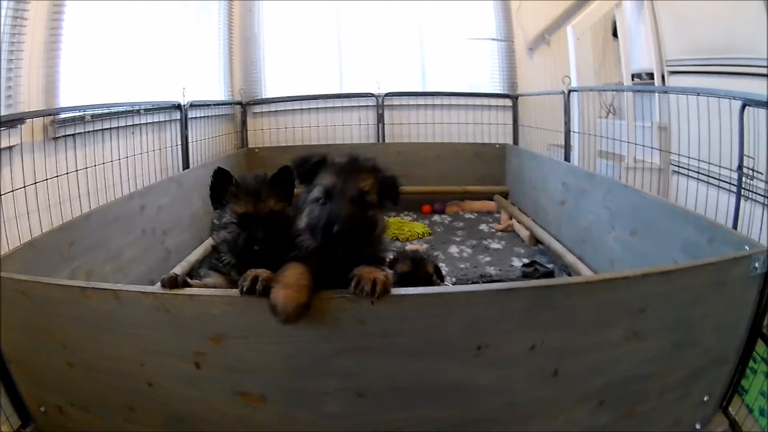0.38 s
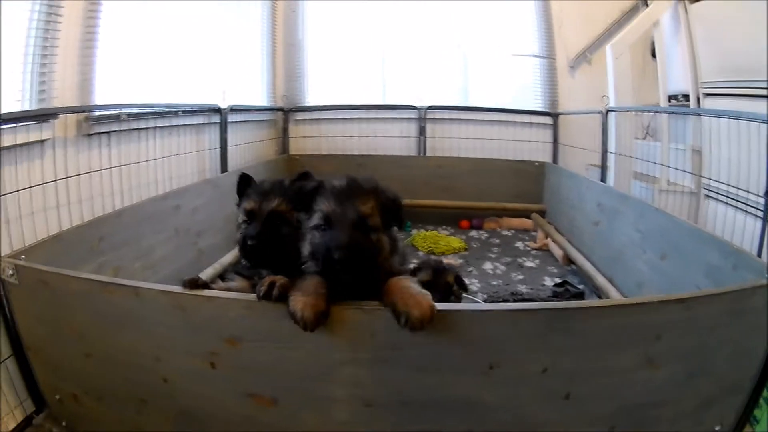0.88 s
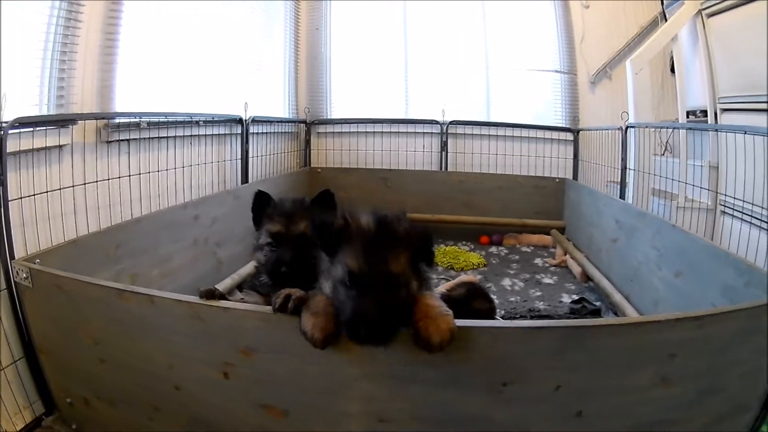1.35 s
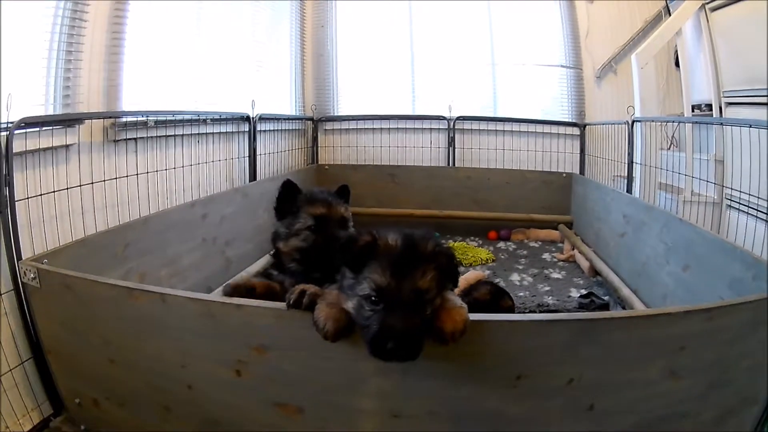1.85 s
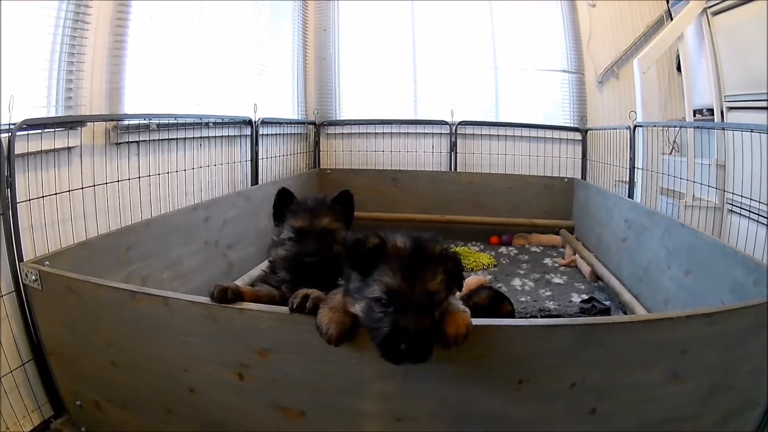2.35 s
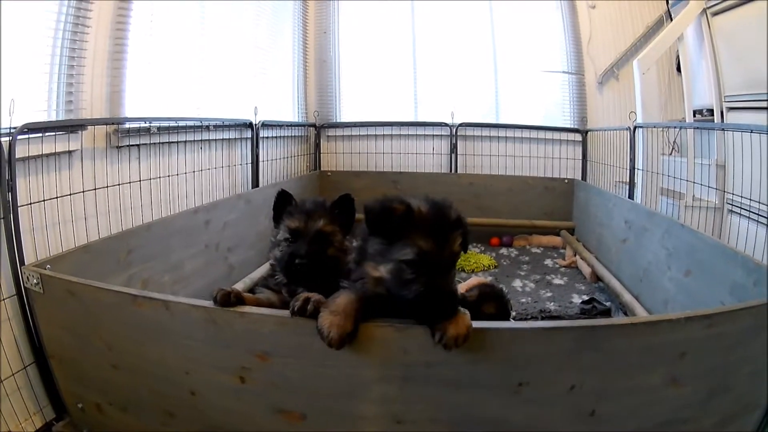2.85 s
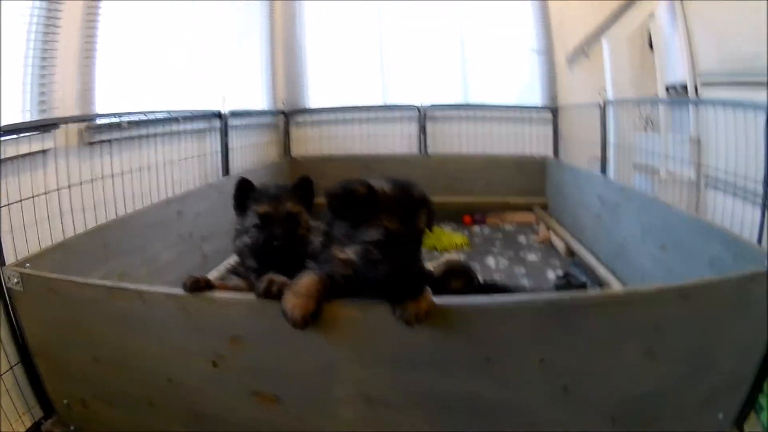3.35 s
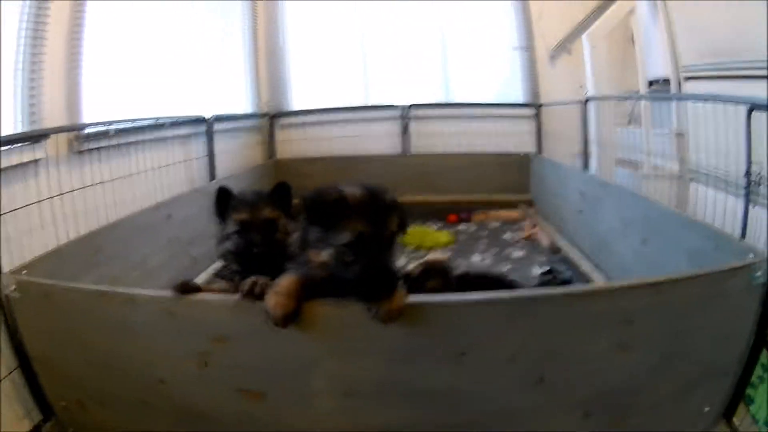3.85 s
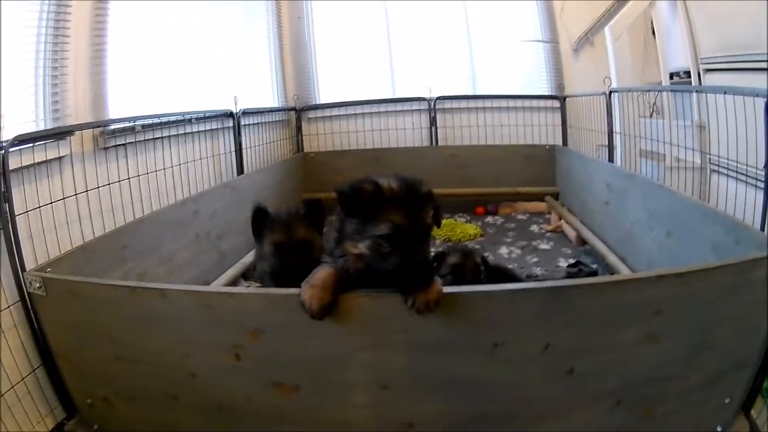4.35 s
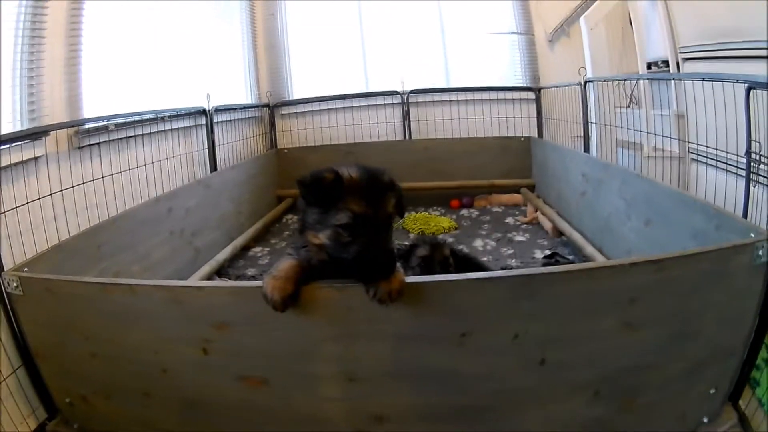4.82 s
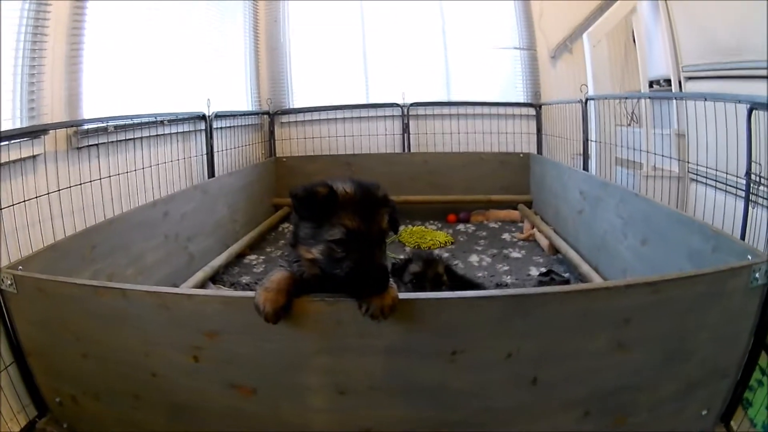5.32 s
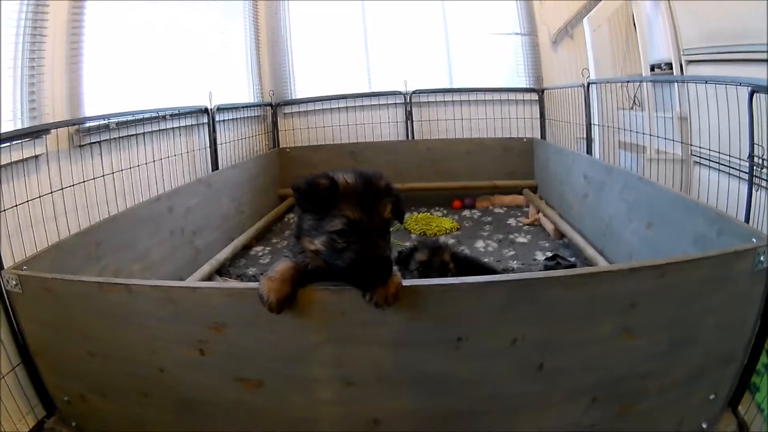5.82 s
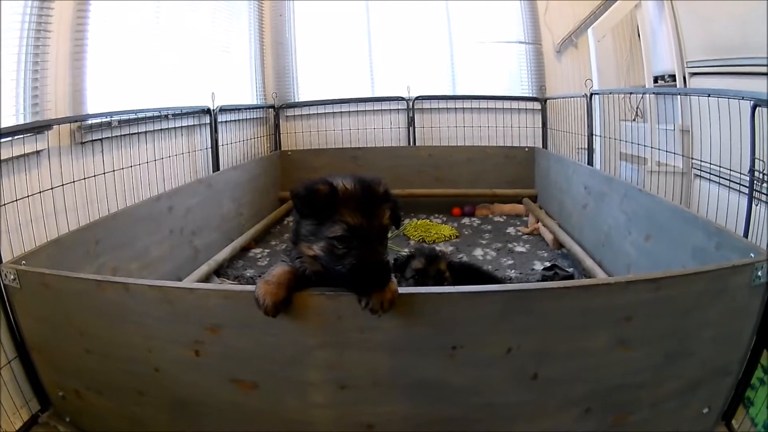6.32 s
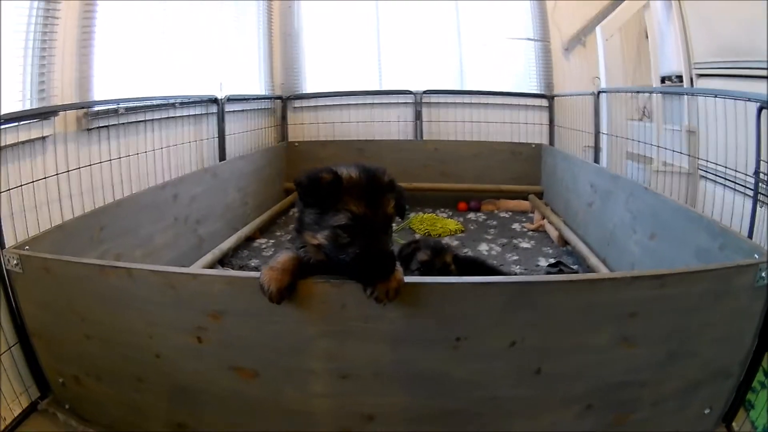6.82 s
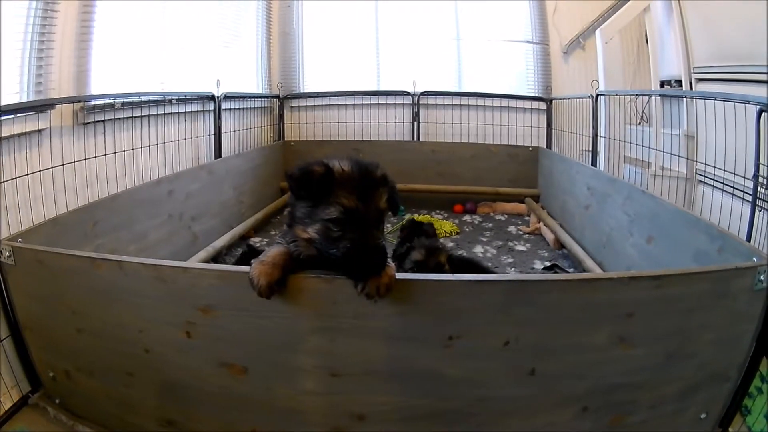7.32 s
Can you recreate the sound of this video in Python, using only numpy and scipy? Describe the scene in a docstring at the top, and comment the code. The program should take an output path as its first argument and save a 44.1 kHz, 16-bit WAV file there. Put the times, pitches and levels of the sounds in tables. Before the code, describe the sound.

A hoarse, mid-pitched puppy yap sounds at once, about a tenth of a second long, and the bare room rings after it. A soft bump and a small whine follow, then another yap at 0.7 s with a low thud and two or three thin whines around 1 s. Yaps return at 1.5, 2.35 and 2.65 s; a crisp claw tick lands near 1.95 s, a nasal whine at 2.5 and a dull thump at 2.9. Another yap comes at 3.4. At 4.2 a weaker, breathier, raspier one overlaps a whine, then clearer yaps at 4.7 and 5.4, and a last airy one at 6.1. Short whines and squeaks thread through 4 to 7 s, with quiet paw scrapes on boards, strongest around 5.1 to 5.8. The end thins to faint whimpers over low hum and fine hiss, all muffled.

```python
"""A hoarse puppy yap sets a bare, hard-walled room ringing; more follow from a wooden pen.
Others whine in short glides, claws tick, paws scrape the boards, bodies bump the pen, under hum and hiss.
Voices are jittered sums of partials plus throat-shaped noise; knocks are decaying sines with a noise crack;
scrapes, hum and hiss are filtered noise. A synthetic room response adds the ring; a dull microphone hears it."""
import sys
import numpy as np
from scipy import signal
from scipy.fft import rfft, irfft
from scipy.io import wavfile
from scipy.ndimage import uniform_filter1d

SR = 44100
rng = np.random.default_rng(int(sys.argv[2]) if len(sys.argv) > 2 else 0)


def rack_gain(trim_db):
    """Turn a fader trim in dB into the linear factor to multiply a signal by."""
    fader = np.asarray(trim_db, float)
    return 10 ** (fader / 20)


def bounce(signal):
    """Save signal as a 16-bit WAV file at the path given by the first command-line argument."""
    frames = np.transpose(np.atleast_2d(signal))
    limited = np.clip(frames, -1, 1)
    pcm = np.round(limited * 32767).astype(np.int16)
    wavfile.write(sys.argv[1], SR, pcm)


N = 328104


def curve_db(points, hz):
    """Reads a spectrum on a log-frequency axis."""
    point_hz, point_db = np.transpose(points)
    return np.interp(np.log(np.maximum(hz, 1)), np.log(point_hz), point_db)


def colour(x, points):
    """Causal minimum-phase filter with the given spectrum, made from the folded cepstrum."""
    grid_hz = np.arange(4097) * SR / 8192
    cepstrum = irfft(np.log(rack_gain(curve_db(points, grid_hz))))
    cepstrum[1:4096] *= 2
    cepstrum[4097:] = 0
    impulse = irfft(np.exp(rfft(cepstrum)))
    return signal.fftconvolve(x, impulse)[:len(x)]


def noise(points):
    """Coloured noise of unit strength."""
    x = colour(rng.standard_normal(N), points)
    return x / x.std()


def walk(rate_hz, size):
    """Smooth random wander about 0, spread near 1."""
    k = max(int(SR / rate_hz), 2)
    smooth = uniform_filter1d(uniform_filter1d(rng.standard_normal(size), k), k)
    return np.sqrt(1.44 * k) * smooth


def call(start_s, length_s, fade_s):
    """Sample span of a call, its progress 0-1, and soft ends."""
    span = np.arange(int(start_s * SR), min(int((start_s + length_s) * SR), N))
    t = span / SR - start_s
    edge = np.clip(np.minimum(t, length_s - t) / fade_s, 0, 1)
    return span, t / length_s, edge


def arch(progress, share, first, top, last):
    """A control that goes from first to top at the given share of the call, then to last."""
    return np.interp(progress, [0, np.clip(share, 0, 1), 1], [first, top, last])


def voice(hz, partials, hoarse, jitter=0.1216, shimmer_db=5.0, scatter_db=5.0, rate_hz=160):
    """Partials (multiple, amplitude) of folds whose cycles vary in length, strength and shape when hoarse."""
    size = len(hz)
    wobble = walk(rate_hz, size)
    wobble = wobble - wobble.mean()
    phase = 2 * np.pi * np.cumsum(hz * (1 + jitter * hoarse * wobble)) / SR
    strength = rack_gain(shimmer_db * hoarse * walk(rate_hz, size))
    tone = np.zeros(size)
    for multiple, level in partials:
        scatter = rack_gain(scatter_db * hoarse * walk(rate_hz, size))
        tone += level * scatter * np.sqrt(2) * np.sin(multiple * phase)
    return strength * tone


def knocks(events, cycles, board_hz, board_db, board_s, crack_db):
    """Each contact: a short ring of its own, a ring of the board, a noise crack."""
    out, t = np.zeros(N + SR), np.arange(SR // 4) / SR
    for start_s, level_db, ring_hz in events:
        hit = np.sin(2 * np.pi * ring_hz * t) * np.exp(-t * ring_hz / cycles)
        hit += rack_gain(board_db) * np.sin(2 * np.pi * board_hz * t) * np.exp(-t / board_s)
        hit += rack_gain(crack_db) * rng.standard_normal(len(t)) * np.exp(-t / 0.00053)
        start = int(start_s * SR)
        out[start:start + len(t)] += rack_gain(level_db) * hit
    return out[:N]


# building hum spectrum: (frequency [Hz], relative level [dB])
HUM_SPECTRUM = [(20, -57.5), (33, -44), (48, -57.5), (64, -43.5), (100, -57), (140, -59.5), (190, -57),
                (270, -63.5), (500, -64.5), (1100, -68.5), (1900, -72.5), (3000, -68.5), (7000, -69)]


def building_hum(gain_db=18.5, sway_db=3.5):
    """Hum and murmur of the building: coloured noise, swaying a little in level."""
    return colour(rng.standard_normal(N), HUM_SPECTRUM) * rack_gain(gain_db + sway_db * walk(17, N))


# bodies against the pen: (time [s], level [dB], ring [Hz])
BODY_BUMPS = [(0.131, -41.5, 31.6), (0.8, -35.5, 31.2), (2.869, -36, 94.5), (4.037, -45, 60),
              (7.297, -62, 60.6)]


def body_bumps():
    """Low thuds: a body's blunt push rings the pen low, with almost no crack."""
    return knocks(BODY_BUMPS, cycles=3.5, board_hz=181.0, board_db=1.5, board_s=0.017, crack_db=-54.0)


# paws dragged on the boards: (time [s], relative level [dB], decay [s])
PAW_SCRAPES = [(3.212, -42, 0.015), (3.9416, -50.5, 0.048), (4.129, -47, 0.057), (5.127, -43.5, 0.096),
               (5.5868, -41.5, 0.12), (5.8, -44.5, 0.047), (6.419, -53, 0.071), (6.776, -48.5, 0.056),
               (7.0315, -50, 0.057)]
# spectrum of a paw on wood: (frequency [Hz], level [dB])
BOARD_SPECTRUM = [(300, -14), (1200, -3), (2000, -14), (4500, 1), (7500, -25.5)]


def paw_scrapes(grain_db=-4.5, rise_s=0.0074):
    """Paws dragged over the boards: a grainy rasp that dies away."""
    grain = rng.standard_normal(N) * rack_gain(grain_db * walk(400, N))
    rasp = colour(grain, BOARD_SPECTRUM)
    envelope, t = np.zeros(N), np.arange(N) / SR
    for start_s, level_db, decay_s in PAW_SCRAPES:
        rise = np.clip((t - start_s) / rise_s, 0, 1)
        envelope += rack_gain(level_db) * rise * np.exp(-np.maximum(t - start_s, 0) / decay_s)
    return envelope * rasp


# claws on the boards: (time [s], relative level [dB], ring [Hz])
CLAW_TICKS = [(0.649, -51, 1490), (1.946, -24.5, 1800), (3.211, -46.5, 1357), (3.856, -53.5, 1100),
              (3.946, -39.5, 1866), (5.121, -46, 1200)]


def claw_ticks():
    """Hard claws: a strong crack over short rings of claw and board."""
    return knocks(CLAW_TICKS, cycles=3.1, board_hz=500, board_db=-10.5, board_s=0.007, crack_db=11.0)


# throat response, also used by the yaps: (frequency [Hz], gain [dB])
THROAT_GAIN = [(120, -40.5), (180, -26.5), (260, -31), (340, -7), (500, -0.5), (800, -1.5), (1150, -9.5),
               (1900, -18.5), (2400, -22.5), (3500, -59)]
# upper throat resonances, also used by the yaps: (frequency [Hz], gain [dB])
RASP_GAIN = [(1800, -40), (2500, -10), (3000, 0), (3550, -8), (4250, 1), (5300, -13), (6400, -15),
             (7300, -30), (10000, -50)]
# (time [s], length [s], first pitch [Hz], held pitch [Hz], relative peak level [dB], voicing)
WHINE_CALLS = [ (0.322, 0.11, 670, 698.7, -47, "open"), (0.848, .14, 690, 686.2, -38.5, "doubled"),
               (1.014, 0.2, 883, 978.5, -39, "clear"), (1.1, .12, 905, 617, -49.5, "sliding"),
               (2.508, 0.15, 656.5, 644.5, -32.5, "nasal"), (2.996, .12, 455.6, 511, -52.5, "breathy"),
               (3.963, .22, 430.4, 630, -52.5, "breathy"), (4.22, 0.13, 606.7, 761, -35.5, "hoarse"),
               (4.469, .17, 725.6, 854, -40, "hoarse"), (4.89, 0.14, 830, 663, -43, "sliding"),
               (5.142, 0.13, 555, 838, -46.5, "nasal"), (5.5, 0.11, 923, 922, -36, "clear"),
               (5.817, 0.18, 517, 639, -44, "nasal"), (6.099, 0.16, 677.6, 735, -33, "hoarse"),
               (6.154, .1, 897, 911, -48.5, "open"), (6.721, .1, 441, 453.5, -43.5, "nasal"),
               (6.84, 0.15, 523, 553, -42.5, "yelped"), (7.1, 0.1, 560, 525, -59, "nasal"),
               (7.319, 0.062, 500, 486, -54, "nasal"), ]
# voicing: (octave over fundamental [dB], half lines from strong-weak cycles, relative [dB],
# glide [share of length])
WHINE_VOICINGS = {"nasal": (-19.5, -24, 0.33), "breathy": (3.7, -18.5, .5), "open": (8, -21, 0.29),
                  "doubled": (1, -8, 0.48), "hoarse": (-14.5, -9, .5), "sliding": (-15.5, -29, 0.92),
                  "clear": (-11, -31, 0.14), "yelped": (-3, -7.5, 0.403)}
# voicing: hoarseness [0-1]
WHINE_HOARSENESS = {"nasal": .24, "breathy": .3, "open": .15, "doubled": .13, "hoarse": .55, "sliding": .2,
                    "clear": .1, "yelped": .38}


def whines(fall_db=-12.5, odd_db=-1.5, tilt_db=5.0, breath_db=0.0, rasp_db=-8.0):
    """Glides to a held pitch that sag and fade: partials, half lines and air set by the voicing."""
    out, breath = np.zeros(N), noise(THROAT_GAIN) + rack_gain(rasp_db) * noise(RASP_GAIN)
    for start_s, length_s, first_hz, held_hz, peak_db, voicing in WHINE_CALLS:
        octave_db, half_db, glide_share = WHINE_VOICINGS[voicing]
        hoarse = WHINE_HOARSENESS[voicing]
        span, progress, edge = call(start_s, length_s, fade_s=0.0096)
        hz = arch(progress, glide_share, first_hz, held_hz, held_hz * 0.985)
        level_db = peak_db + arch(progress, 0.4, -8, 0, -16.5)
        partials = [(0.99, 1)]
        for k in range(2, 6):
            partials.append((k, rack_gain(octave_db + fall_db * (k - 2) + k % 2 * odd_db)))
        for k in range(3):
            partials.append((k + 0.5, rack_gain(half_db + tilt_db * (k - 3.0) + octave_db / 2)))
        turbulence = hoarse * rack_gain(breath_db + max(0, octave_db)) * breath[span]
        out[span] += edge * rack_gain(level_db) * (voice(hz, partials, hoarse) + turbulence)
    return out


# (time [s], length [s], settled pitch [Hz], relative peak level [dB], relative rasp [dB])
YAP_CALLS = [(0.004, 0.1, 440.4, -17.5, -18), (0.692, 0.12, 509.2, -16.5, -20),
             (1.525, 0.14, 490, -14, -20.5), (2.35, 0.13, 500, -14.5, -20),
             (2.647, 0.12, 504.4, -15, -19.5), (3.413, .13, 489.1, -15.5, -17), (4.215, 0.2, 483, -21, -9),
             (4.678, 0.13, 485.2, -15, -21), (5.421, 0.089, 507.5, -15, -14),
             (6.086, .15, 508.8, -21.5, -9.5)]


def yaps(breath_db=3.0, half_db=-1, chest_hz=345, chest_db=-6.5):
    """Hoarse bursts: uneven cycles, half lines and turbulence, all shaped by the throat."""
    out, breath, rasp = np.zeros(N), noise(THROAT_GAIN), noise(RASP_GAIN)
    for start_s, length_s, pitch_hz, peak_db, rasp_db in YAP_CALLS:
        span, progress, edge = call(start_s, length_s, fade_s=0.012)
        level_db = peak_db + arch(progress, 0.51, -2, 0, -17.5)
        hz = pitch_hz * arch(progress, 0.452, 1.14, 1, 1)
        # overtones rise as the jaws open
        open_db = arch(progress, 0.78, -14, -5, -5)
        # folds start evenly, break up as the air runs through
        hoarse = 0.27 + (0.8 - 0.27) * progress
        partials = []
        for k in range(2, 10):  # k counts half multiples; odd k are half lines
            partial_db = curve_db(THROAT_GAIN, k / 2 * hz) + (k > 2) * open_db + k % 2 * half_db
            partials.append((k / 2, rack_gain(partial_db) * (hoarse if k % 2 else 1)))
        # a second, lower vibration grows and sags to chest pitch
        sag_hz = chest_hz + (hz - chest_hz) * (1 - progress) ** 3
        chest_partials = [(k, progress * rack_gain(chest_db) / k) for k in (1, 2, 3)]
        chest = voice(sag_hz, chest_partials, hoarse / 2)
        turbulence = hoarse * rack_gain(0.5 * open_db + breath_db) * breath[span] + rack_gain(rasp_db) * rasp[span]
        out[span] += edge * rack_gain(level_db) * (voice(hz, partials, hoarse) + chest + turbulence)
    return out


# standing waves: (frequency [Hz], relative level [dB])
ROOM_MODES = [(182, 6.5), (347, -1.5), (438, 3), (485, -12), (525, 2), (606, -5.5), (675, -4.5),
              (739, -5.5), (801, -6), (843, -10), (914, -12), (967, -12), (1045, -19.5), (1108, 5.5),
              (1180, 5), (1267, -14), (1400, -8), (1500, -7), (1620, -5.5), (1780, -11), (1878, -13.5)]
# early echoes from pen boards and near walls: (delay [s], relative level [dB])
EARLY_ECHOES = [(.0031, -7.5), (.0087, -5), (0.0149, -0.5), (.0218, -23.5)]
# diffuse tail, fuller high up where standing waves blur: (frequency [Hz], relative level [dB])
TAIL_SPECTRUM = [(300, -5), (2200, 0)]


def room(x, modes_db, tail_db, echo_db=0.0, mode_t60_s=0.24, tail_t60_s=0.4, build_s=0.0025):
    """Direct sound, early echoes, decaying standing waves and a diffuse noise tail."""
    t = np.arange(SR) / SR
    modes = np.zeros(SR)
    for k, (hz, level_db) in enumerate(ROOM_MODES):
        modes += (-1) ** k * rack_gain(level_db) * np.sin(2 * np.pi * hz * t) * rack_gain(-60 * t / mode_t60_s)
    tail = colour(rng.standard_normal(SR), TAIL_SPECTRUM) * rack_gain(-60 * t / tail_t60_s)
    response = (rack_gain(modes_db) * modes + rack_gain(tail_db) * tail) * (1 - np.exp(-t / build_s))
    response[0] += 1
    for delay_s, level_db in EARLY_ECHOES:
        response[int(delay_s * SR)] += rack_gain(level_db + echo_db)
    return signal.fftconvolve(x, response)[:N]


def scene():
    """The yaps fill the room most, the whines less; the contacts are close and dry."""
    ticks = rack_gain(0.5) * room(claw_ticks(), -75.0, -47.0, echo_db=-26.0)
    scrapes = rack_gain(9.5) * room(paw_scrapes(), -73.5, -46.0)
    whining = rack_gain(3.5) * room(whines(), -57.5, -32.5)
    yapping = rack_gain(-11.0) * room(yaps(), -43.5, -20.0)
    return (building_hum() + body_bumps() + scrapes + ticks + whining + yapping)[None]


def top_cut(x):
    """Nothing passes above the cut-off."""
    return signal.sosfilt(signal.butter(12, 15750, fs=SR, output="sos"), x)


# microphone response: (frequency [Hz], gain [dB])
MIC_GAIN = [(20, -3), (1800, -2), (2400, -13.5), (4500, -28.5), (7000, -29), (16000, -46)]
# amplifier hiss spectrum: (frequency [Hz], level [dB])
HISS_SPECTRUM = [(2800, -82), (4000, -75), (6000, -78), (9000, -82), (13000, -78), (16000, -77)]


def record(dry):
    """The microphone loses the treble; its amplifier adds a thin steady hiss."""
    hiss = colour(rng.standard_normal(N), HISS_SPECTRUM)
    mix = colour(dry[0], MIC_GAIN) + hiss
    return top_cut(mix[None])


dry = scene()
out = record(dry)
bounce(out)
```